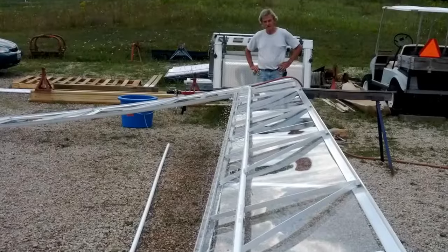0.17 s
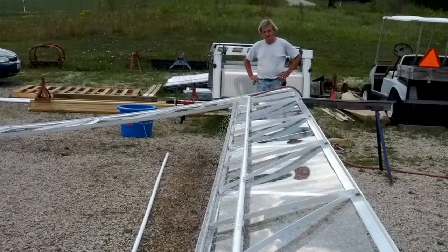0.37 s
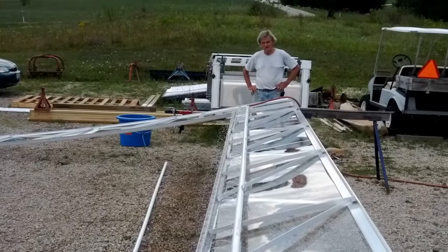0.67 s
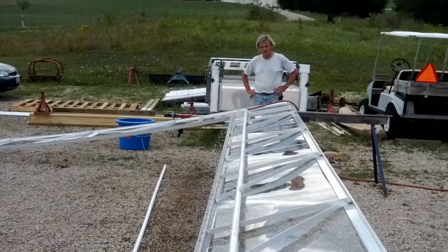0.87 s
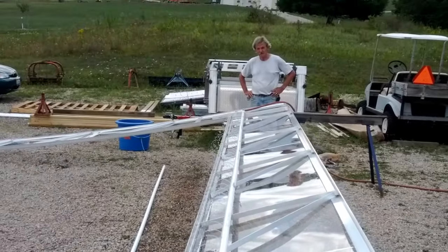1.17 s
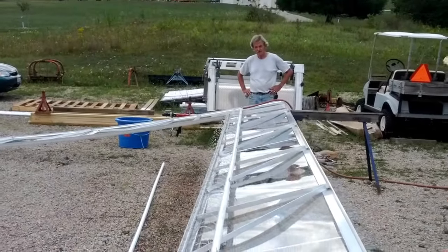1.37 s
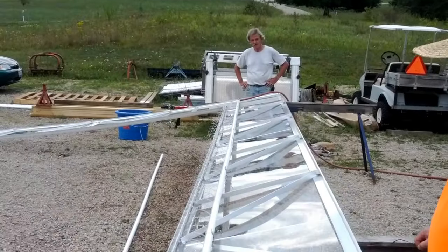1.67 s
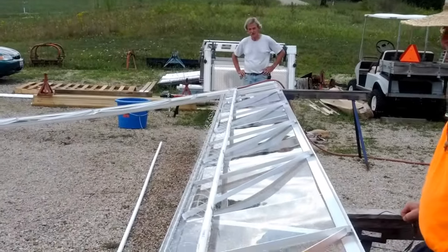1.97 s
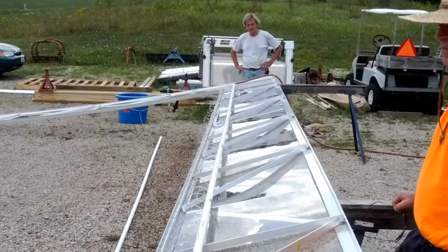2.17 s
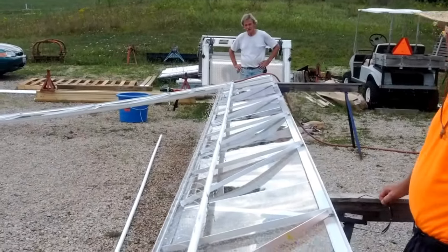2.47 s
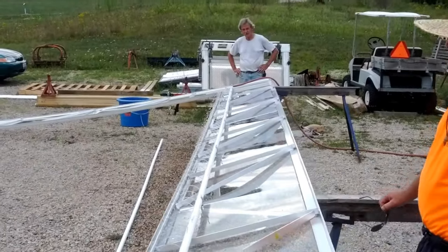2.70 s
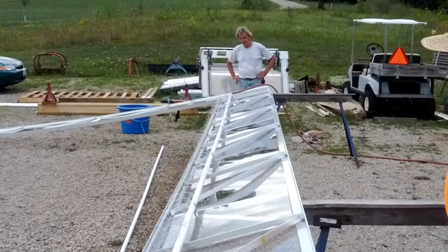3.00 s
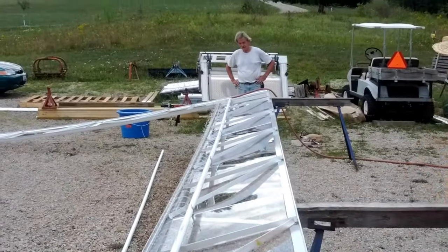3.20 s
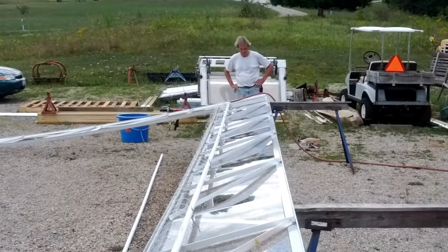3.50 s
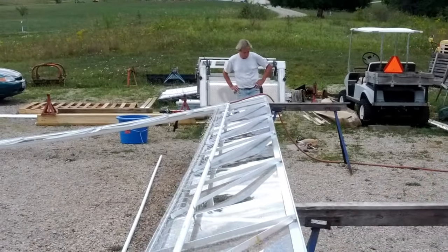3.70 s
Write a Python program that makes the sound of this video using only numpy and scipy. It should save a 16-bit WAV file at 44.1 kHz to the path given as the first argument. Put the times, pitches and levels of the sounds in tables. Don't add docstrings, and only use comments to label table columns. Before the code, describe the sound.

Water trickles and splashes onto plastic film, with bubbly plinks and low wind thumps outdoors.

```python
import sys
import numpy as np
from scipy import signal
from scipy.fft import rfft, irfft, next_fast_len
from scipy.io import wavfile
from scipy.ndimage import uniform_filter1d, map_coordinates

SR = 44100
rng = np.random.default_rng(int(sys.argv[2]) if len(sys.argv) > 2 else 0)


def persist_wave(psi):
    counts = np.round(np.clip(psi, -1, 1) * 32767).astype(np.int16)
    wavfile.write(sys.argv[1], SR, np.atleast_2d(counts).T)


def level_to_linear(level):
    exponent = np.asarray(level, float) / 20
    return 10 ** exponent


N = 169785


def unit(x):
    return x / np.sqrt(np.mean(x ** 2) + 1e-20)


def curve(rows):
    return np.interp(np.arange(N) / SR, *np.transpose(rows))


def wobble(rate):
    knots = rng.standard_normal(int(N * 80 / SR))
    return map_coordinates(knots, [np.arange(N) * min(rate, 70) / SR])


def coloured(x, points):
    size = next_fast_len(N + 8192)
    hz, db = np.transpose(points)
    bins_hz = np.fft.rfftfreq(size, 1 / SR)
    gain = level_to_linear(np.interp(np.log(bins_hz + 1), np.log(hz), db))
    return unit(irfft(rfft(x, size) * gain, size)[:N])


def patchy(depth_db):
    z = signal.stft(rng.standard_normal(N), nperseg=256)[2]
    field = uniform_filter1d(rng.standard_normal(z.shape), size=5, axis=0)
    field = uniform_filter1d(field, size=6, axis=1)
    return unit(signal.istft(z * level_to_linear(depth_db * unit(field)), nperseg=256)[1][:N])


def chirps(s, db, hz, cycles, rise, attack, size):
    columns = np.broadcast_arrays(s, db, hz, cycles, rise)
    s, db, hz, cycles, rise = (np.asarray(v)[:, None] for v in columns)
    t = np.arange(size) / SR
    age = t * hz / cycles
    envelope = level_to_linear(db - 20 * age) * (1 - np.exp(-age / attack))
    wave = envelope * np.sin(2 * np.pi * hz * t * (1 + rise * np.minimum(age, 2) / 2))
    wave = wave * np.cos(np.pi / 2 * t / t[-1])
    at = np.round(s * SR).astype(int) + np.arange(size)
    return np.bincount(at.ravel(), wave.ravel(), N + size)[:N]


def swarm(count, lo_hz, hi_hz, cycles, spread_db, rise, size):
    when, pitch, big, life = rng.random((count, 4)).T
    hz = lo_hz * (hi_hz / lo_hz) ** pitch
    db = -spread_db * np.log(1 - .96 * big)
    return unit(chirps(when * N / SR, db, hz, cycles * (.4 + life), rise * life, .1, size=size))


def stream():
    # time in seconds, loudness of the stream in dB.
    flow_rows = [
        (0, -37.5),
        (.9, -37),
        (1.7, -38),
        (2.4, -38.5),
        (3.1, -42.5),
        (3.85, -41),
    ]
    # frequency in Hz, level in dB per Hz.
    gurgle_colour = [(250, -73), (600, -13.5), (1000, -6.5), (1570, -3.5), (2450, -3.5), (3100, -7.5),
                     (4500, -6), (7000, -52)]
    spray_colour = [(2300, -18), (3700, -13), (6600, -3), (7700, -7.5), (10800, -5), (12700, 0), (15000, 1),
                    (16200, -14)]
    flow_db = curve(flow_rows)
    mean_db = flow_db.mean()
    swing_db = flow_db - mean_db
    splash_db = 0.88 * wobble(12) + 1.43 * wobble(35.42)

    bubbles = swarm(count=1300, lo_hz=764.6, hi_hz=4690, cycles=18.0, spread_db=3.5, rise=0.21, size=800)
    bubbles_db = 2.6 * swing_db + 2.2 * wobble(6.8)
    gurgle = 0.8 * patchy(4.5) + .24 * level_to_linear(bubbles_db) * bubbles
    gurgle_db = mean_db - 9 + 0.11 * swing_db + 0.73 * splash_db

    fizz = swarm(count=1500, lo_hz=3500, hi_hz=11150, cycles=12.7, spread_db=3.5, rise=0.059, size=300)
    ticks = swarm(count=3000, lo_hz=11000, hi_hz=15500, cycles=5.5, spread_db=4.5, rise=0, size=80)
    spray = 0.73 * patchy(2.2) + 0.37 * level_to_linear(0.67 * wobble(6.74)) * fizz + 0.34 * ticks
    spray_db = flow_db - 0.5 + splash_db
    return level_to_linear(gurgle_db) * coloured(gurgle, gurgle_colour) + level_to_linear(spray_db) * coloured(spray, spray_colour)


def large_bubbles():
    # start in seconds, peak in dB, pitch in Hz, life in cycles, share of pitch gained.
    bubble_rows = [(0.182, -28.5, 1790, 17, 0.26), (0.238, -29, 1690, 18, 0.37),
                   (0.352, -28.5, 1600, 18, 0.22), (0.379, -36, 1240, 21, 0.32),
                   (0.445, -39, 1350, 13, 0.48), (0.473, -33, 1510, 17, 0.28), (0.509, -36, 1326, 19, 0.24),
                   (0.545, -28, 2480, 11, 0.28), (0.622, -34, 1370, 16, 0.24), (0.68, -26, 1990, 31, 0.37),
                   (0.712, -26.5, 1780, 17, 0.24), (0.775, -21.5, 2040, 6.3, 0.25),
                   (0.986, -29.5, 1900, 16, 0.31), (1.227, -32, 1140, 16, 0.32),
                   (1.252, -30.5, 1270, 16, 0.35), (1.291, -20.5, 1300, 7.4, 0.22),
                   (1.332, -27.5, 1790, 16, 0.3), (1.5, -32, 1488, 25, 0.41),
                   (1.615, -29.5, 2340, 29, 0.32), (1.647, -32, 984, 13, 0.32),
                   (1.746, -35.5, 1800, 19, 0.25), (2.039, -30.5, 1036, 10, 0.21),
                   (2.105, -30, 985, 15, 0.34), (2.289, -31, 1860, 13, 0.14)]
    s, db, hz, cycles, rise = np.transpose(bubble_rows)
    return chirps(s, db + 0.12, .92 * hz, np.clip(cycles, 2, 40), rise, 0.029, size=2200)


def small_bubbles():
    # start in seconds, peak in dB, pitch in Hz.
    plink_rows = [(0.2071, -26.5, 3500), (0.413, -24.5, 3500), (0.4632, -20, 5970), (0.647, -26, 3980),
                  (0.667, -30, 2130), (0.8524, -31, 2350), (1.044, -22.5, 6300), (1.3264, -30, 1850),
                  (1.7442, -32, 1790), (1.9136, -29, 2250), (2.066, -34, 1070), (2.2019, -36, 1290),
                  (2.2155, -28.5, 2550)]
    drip_rows = [(0.036, -28.5, 1560), (0.224, -30, 1770), (0.414, -34, 2130), (0.923, -44, 1190),
                 (0.962, -38, 1710), (1.02, -28, 1670), (1.105, -28, 1980), (1.163, -31, 2000),
                 (1.38, -35, 1306), (1.459, -32, 1900), (1.476, -31, 1640), (1.568, -33, 2140),
                 (1.586, -33.5, 1300), (1.676, -36, 814), (1.717, -37, 931), (1.87, -36, 1230),
                 (2.571, -37.5, 1860), (2.621, -35, 1110), (2.766, -33, 930), (2.863, -32.5, 833.7),
                 (3.107, -34.5, 1350), (3.16, -31, 1670), (3.335, -33, 1510), (3.656, -34, 1136)]
    fizz_rows = [(0.0851, -29, 6950), (0.2296, -24.5, 6540), (0.3552, -30, 3780), (0.7012, -23, 6570),
                 (0.7387, -29, 5370), (0.8613, -30, 5320), (0.9182, -35, 4870), (0.945, -24.5, 5950),
                 (1.011, -25, 6780), (1.1237, -23, 6130), (1.3264, -21, 7370), (1.3785, -20.5, 6650),
                 (1.5573, -24, 6300), (1.7435, -24, 5030), (2.0577, -27, 6000), (2.267, -33, 4800),
                 (2.6178, -33, 2890), (2.7341, -31, 6830), (3.478, -31, 3560), (3.665, -33, 4300),
                 (3.832, -32, 3240)]
    s, db, hz = np.transpose(plink_rows)
    plinks = chirps(s, db + 1.5, hz, 12.4, .15, .07, size=700)
    s, db, hz = np.transpose(drip_rows)
    drips = chirps(s, db - 3.5, .93 * hz, 13.4, 0.233, 0.035, size=1800)
    s, db, hz = np.transpose(fizz_rows)
    return plinks + drips + chirps(s, db - 1.5, 0.953 * hz, 18, 0.11, 0.045, size=700)


def film_snaps():
    # time in seconds, peak in dB.
    snap_rows = [(0.1306, -20), (0.1416, -18), (0.2164, -17), (0.2269, -10), (0.2753, -17), (0.3481, -20),
                 (0.4085, -21), (0.4269, -16), (0.4823, -19), (0.5646, -17), (0.6539, -18), (0.7148, -21),
                 (0.7766, -19), (0.8145, -19), (0.8644, -17), (0.9423, -19), (1.0515, -17), (1.1463, -20),
                 (1.2366, -19), (1.2815, -22), (1.3079, -23), (1.3853, -22), (1.5544, -18), (1.5838, -17),
                 (1.6142, -22), (1.6402, -21), (1.7075, -19), (1.733, -12), (1.8193, -20), (1.8711, -23),
                 (1.9425, -20), (2.0283, -23), (2.1864, -22), (2.4778, -23), (2.5731, -26), (2.5875, -13),
                 (2.6658, -22), (2.7112, -22), (2.7352, -23), (2.8848, -22), (2.9362, -25), (2.9667, -29),
                 (2.9806, -23), (3.0135, -21), (3.3702, -24), (3.4151, -23), (3.4376, -17), (3.6805, -25)]
    s, db = np.transpose(snap_rows)
    hz = 12860 * (1 + 0.035 * rng.standard_normal(len(s)))
    return chirps(s + 0.0012, db + 8.5, hz, 9, 0, .16, size=160)


def drops():
    direct = large_bubbles() + small_bubbles() + film_snaps()
    t60_s = 0.071
    tail = rng.standard_normal(2048) * level_to_linear(-60 * np.arange(2048) / SR / t60_s)
    return direct + level_to_linear(-7.5) * signal.fftconvolve(direct, tail / np.linalg.norm(tail))[:N]


def eddies(rag):
    # time in seconds, peak in dB, pitch in Hz.
    eddy_rows = [(0.006, -23.5, 65), (0.292, -19, 74), (0.435, -28, 75.6), (0.498, -26.5, 80.4),
                 (1.012, -9.5, 139), (1.186, -7, 100), (1.366, -10, 74.6), (1.512, -14, 119),
                 (1.598, -17.5, 81.5), (1.742, -16, 73), (1.902, -15, 90), (2.368, -15, 69.6),
                 (2.409, -18, 118), (2.514, -10.5, 97), (2.623, -12, 79), (2.794, -13, 75),
                 (2.846, -9, 70.6), (3.203, -5.5, 111), (3.268, 1.5, 183), (3.313, -5, 202),
                 (3.355, -18, 103), (3.43, -2.5, 271), (3.511, -6, 142), (3.565, -3, 89.5),
                 (3.659, -14.5, 94), (3.696, -12, 209), (3.75, -13, 149),
                 (0.027, -25.5, 240),
        (1.05, -28, 180),
        (2.36, -22.5, 230),
        (3.231, -9, 190),
        (3.291, -9, 264),
        (3.416, -6.5, 315),
        (3.582, -13, 108),
        (1.012, -30, 390),
        (3.245, -16.5, 300),
        (3.18, -28, 450),
    ]
    s, db, hz = np.transpose(np.array(eddy_rows))[:, :, None]
    at = np.round(s * SR).astype(int) + np.arange(-2048, 2048)
    at = np.clip(at, 0, N - 1)
    turns = (at / SR - s) * hz
    width = 0.85 / 2 * (hz / 100) ** 0.25
    pulse = np.cos(2 * np.pi * (turns + rng.random(s.shape))) + level_to_linear(-16.5) * rag[at]
    pulse = level_to_linear(db - 1.5) * np.exp(-(turns / width) ** 2) * pulse * (at > 0)
    return np.bincount(at.ravel(), pulse.ravel(), N)


def wind():
    # time in seconds, wind strength in dB.
    gust_rows = [(0, -26), (.14, -47.5), (.7, -47.5), (.86, -31.5), (1.15, -30), (1.45, -34.5),
                 (1.7, -36.5), (1.9, -32), (2.12, -37.5), (2.42, -24.5), (2.7, -30), (2.83, -25.5),
                 (3.12, -31.5), (3.29, -19.5), (3.46, -22.5), (3.55, -22.5), (3.63, -25), (3.85, -27.5)]
    # frequency in Hz, level in dB per Hz.
    rumble_colour = [(8, -46), (20, 1), (80, -3.5), (120, -11), (250, -31), (500, -88)]
    flutter_colour = [(50, -37), (100, 4.5), (180, 1), (330, -12), (750, -30.5), (1400, -50)]
    strength_db = curve(gust_rows)
    mean_db = strength_db.mean()
    lumps_db = 2.2 * wobble(13)
    rumble = coloured(rng.standard_normal(N), rumble_colour)
    rumble = unit(level_to_linear(lumps_db + 1.9 * wobble(5.13)) * rumble)
    rag = coloured(rng.standard_normal(N), flutter_colour)
    flutter = unit(level_to_linear(1.2 * lumps_db + 3.5 * wobble(35)) * rag)
    flutter_db = mean_db - 14.5 + 2.43 * (strength_db - mean_db)
    return level_to_linear(strength_db + 3) * rumble + level_to_linear(flutter_db) * flutter + eddies(rag)


def open_field():
    # frequency in Hz, level in dB per Hz.
    air_colour = [(200, 1.5), (500, -1.5), (900, 4), (1500, -6), (3000, -9.5), (6000, -31)]
    slosh_s, slosh_width_s = 1.88, .2
    slosh = np.exp(-((np.arange(N) / SR - slosh_s) / slosh_width_s) ** 2)
    return level_to_linear(-56 + 7 * slosh) * coloured(patchy(5.0), air_colour)


def scene():
    return (stream() + drops() + wind() + open_field())[None]


def band_limit(x):
    return signal.sosfilt(signal.butter(12, 16850, fs=SR, output="sos"), x)


def record(dry):
    # start in seconds, length in seconds, lowest Hz, highest Hz, share of patches lost.
    dropout_rows = [(1.586, .018, 7000, 11000, .7), (1.733, .015, 3500, 10500, .5),
                    (2.842, .018, 2500, 8000, .6), (3.165, .045, 4400, 9000, .6),
                    (3.248, .018, 1000, 11200, .95), (3.266, .034, 1000, 7500, .72),
                    (3.298, .052, 4300, 10500, .95), (3.35, .035, 5000, 8200, .6),
                    (3.375, .08, 1000, 2400, .85), (3.385, .07, 2400, 9000, .62),
                    (3.424, .012, 1000, 9000, .9), (1.35, .04, 2800, 3500, .8),
                    (1.692, .016, 3000, 11000, .4), (3.55, .032, 1200, 10300, .85),
                    (3.58, .028, 5000, 9000, .7)]
    top_hz = 15950
    hz, t, z = signal.stft(dry, SR, nperseg=512, noverlap=384)
    for s, length, lo, hi, share in dropout_rows:
        patches = rng.random((43, len(t) // 8 + 1)) < share
        lost = np.kron(patches, np.ones((6, 8), bool))[:len(hz), :len(t)]
        in_band = ((hz > lo) & (hz < hi))[:, None]
        z[:, lost & in_band & (t > s) & (t < s + length)] = 0
    mix = signal.istft(z * (hz < top_hz)[:, None], SR, nperseg=512, noverlap=384)[1][:, :N]
    return band_limit(mix)


dry = scene()
out = record(dry)
persist_wave(out)
```